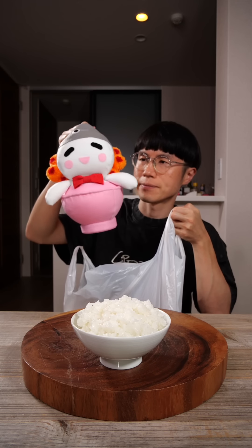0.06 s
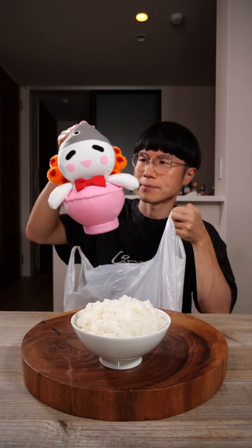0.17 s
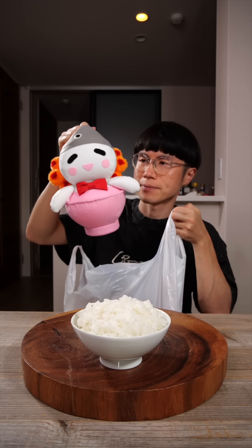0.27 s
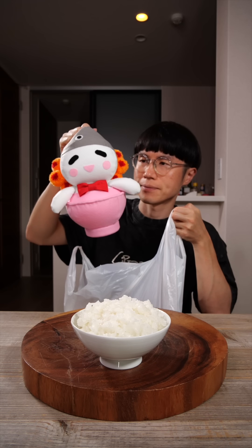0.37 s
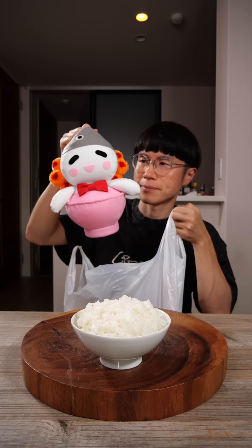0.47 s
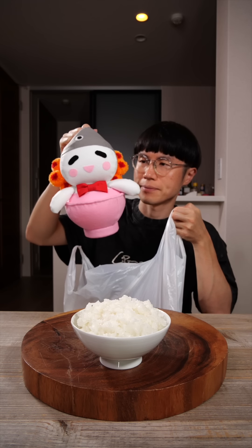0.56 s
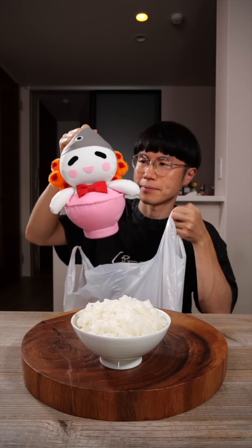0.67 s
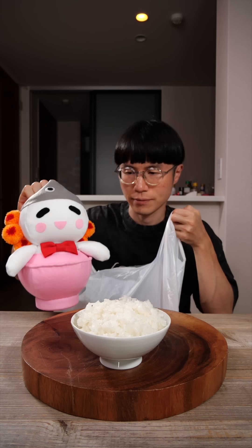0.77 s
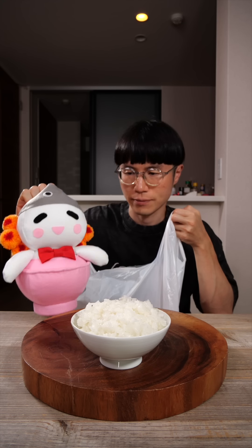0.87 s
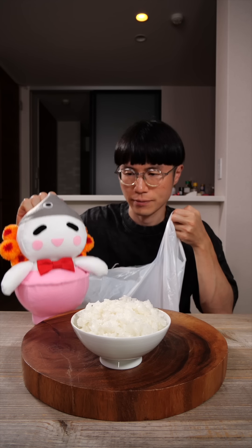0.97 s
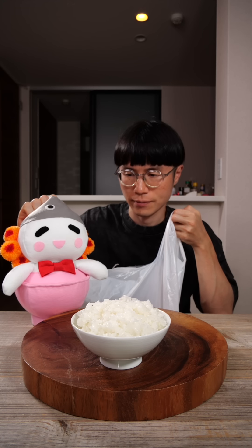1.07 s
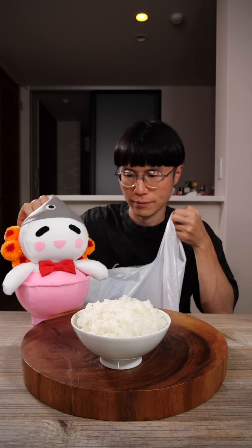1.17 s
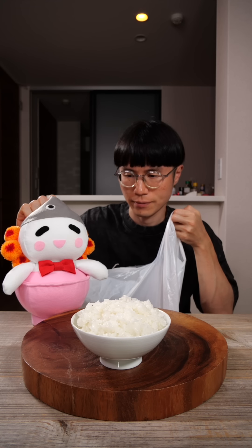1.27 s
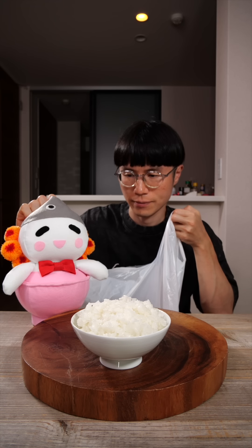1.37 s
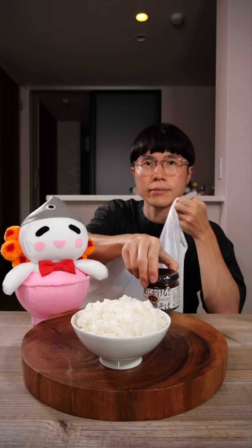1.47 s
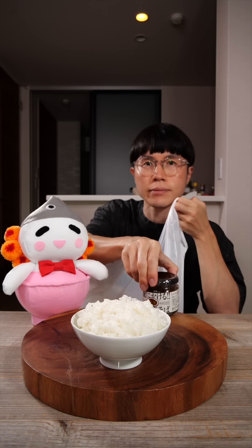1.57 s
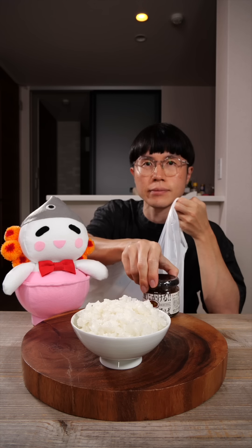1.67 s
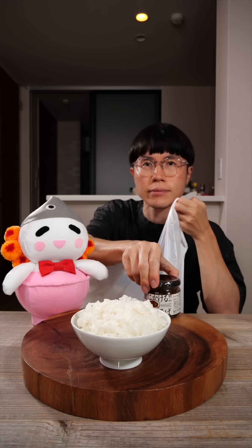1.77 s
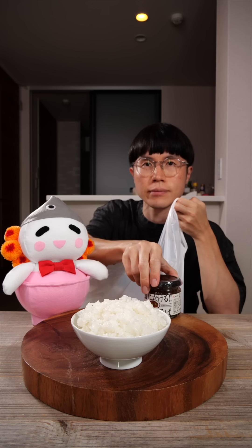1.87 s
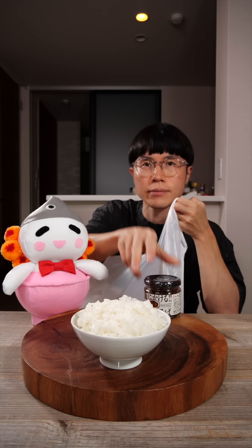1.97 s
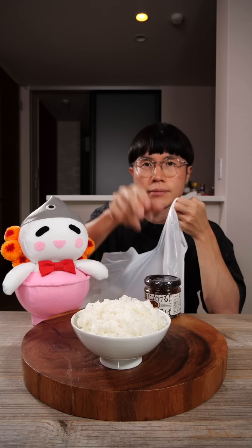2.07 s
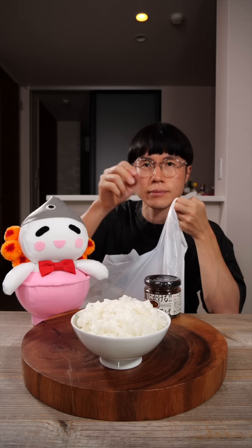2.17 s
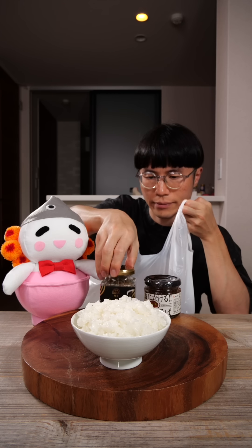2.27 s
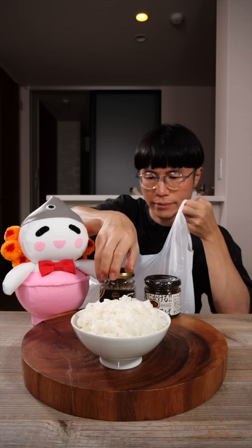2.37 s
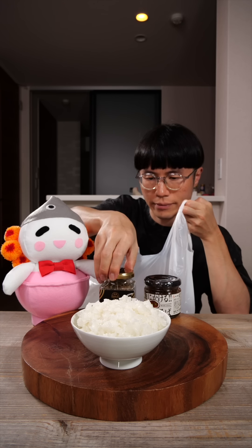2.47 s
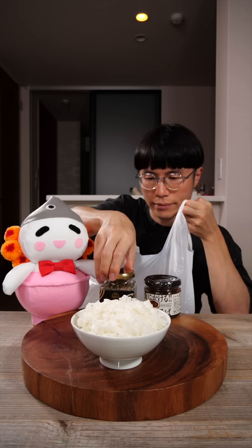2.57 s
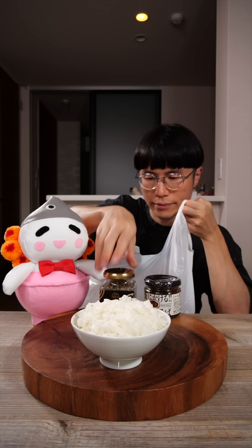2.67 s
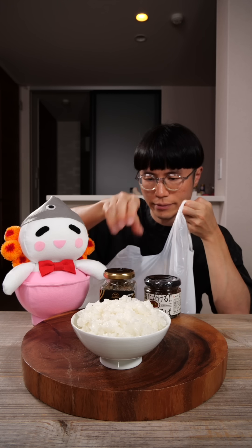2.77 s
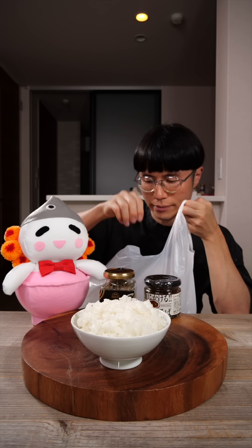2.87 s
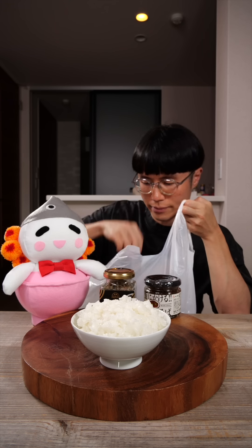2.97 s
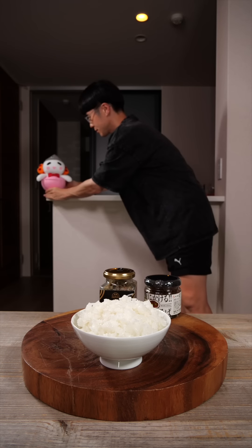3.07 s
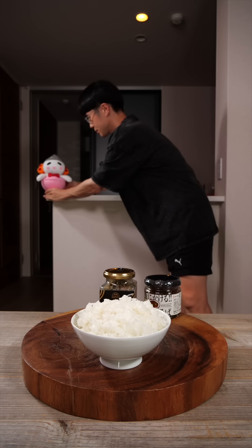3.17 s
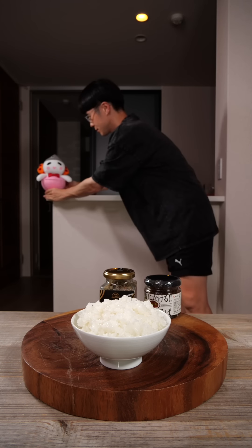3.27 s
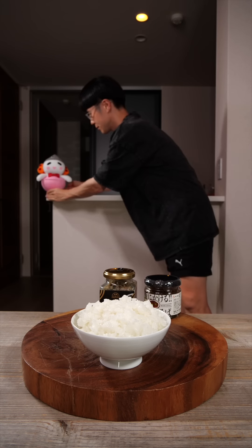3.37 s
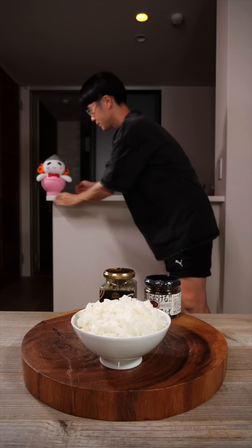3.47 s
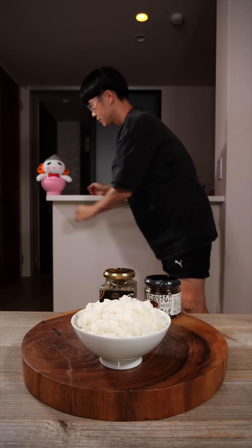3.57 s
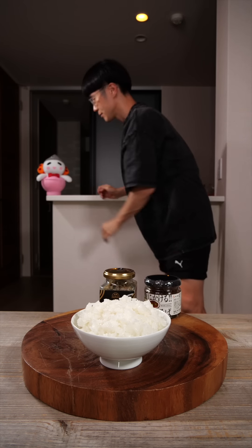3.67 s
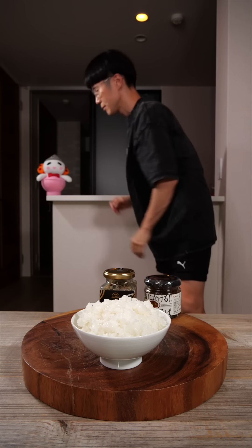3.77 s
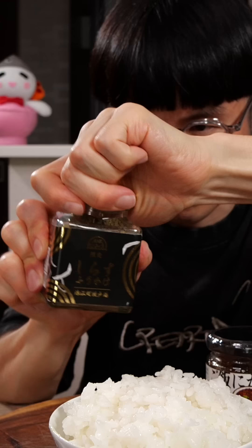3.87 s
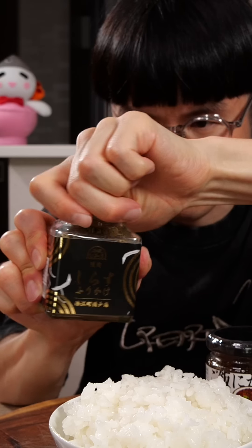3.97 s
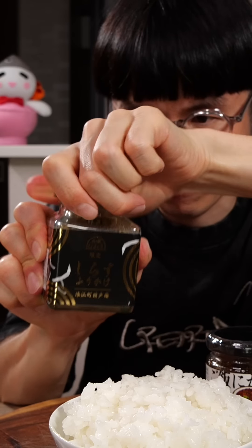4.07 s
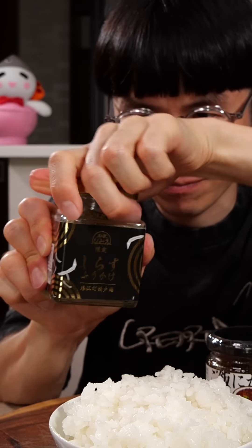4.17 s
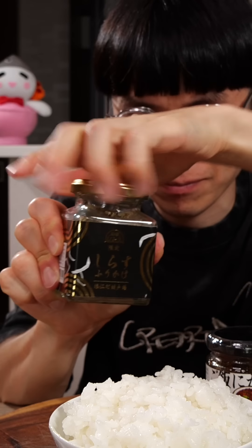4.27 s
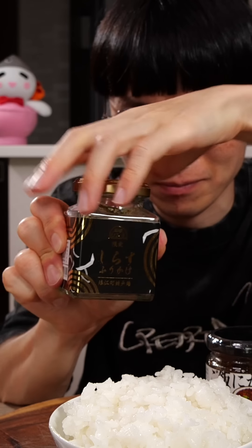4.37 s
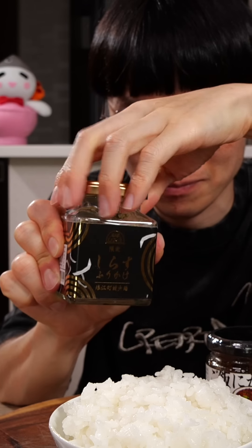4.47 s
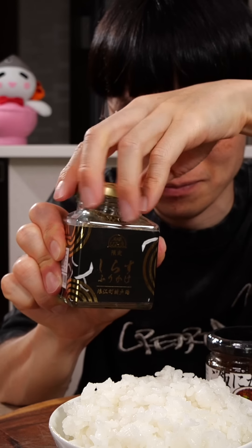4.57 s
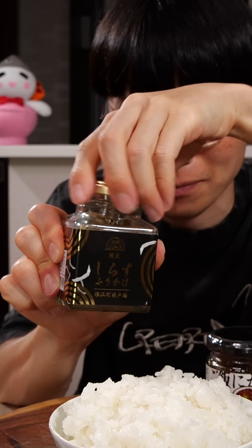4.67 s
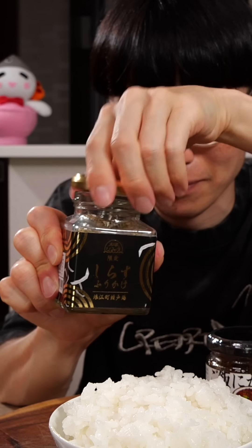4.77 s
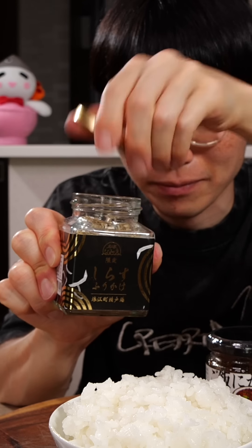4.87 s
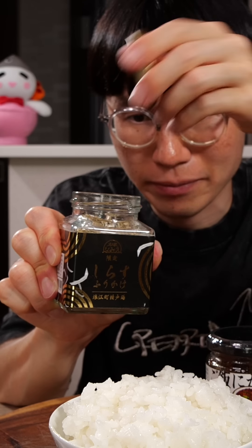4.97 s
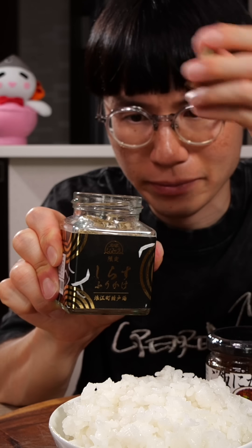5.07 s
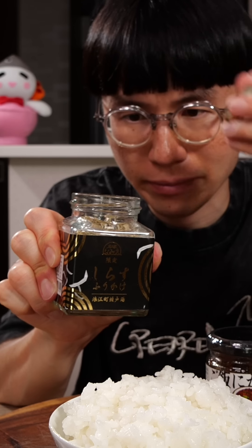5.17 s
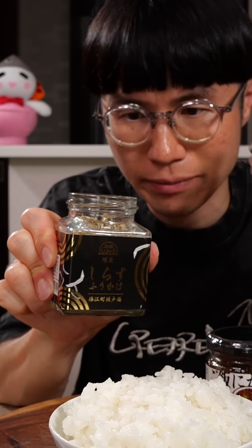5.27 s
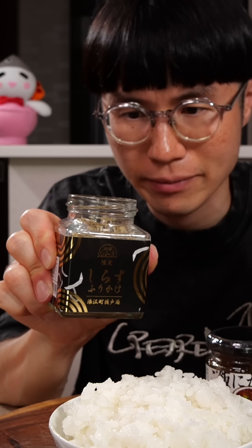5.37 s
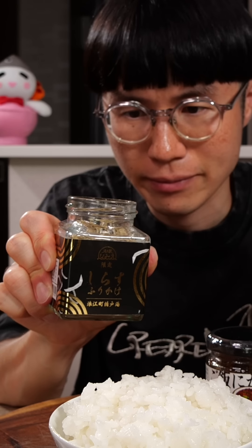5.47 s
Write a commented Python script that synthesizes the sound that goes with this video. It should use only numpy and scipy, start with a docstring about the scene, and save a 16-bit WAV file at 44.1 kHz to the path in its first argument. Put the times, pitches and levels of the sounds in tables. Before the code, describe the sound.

In a quiet living room, a thin plastic bag crackles lightly in short pulls. A plush toy lands softly on the wooden table, then two full glass jars knock down with short muffled clacks. The rustling stops, the toy thumps a counter, and cloth swishes faintly. Finally a metal lid scrapes and ticks against its glass jar, recorded in stereo with short room echo.

```python
"""Unpacking at a wooden table in a quiet living room: a thin plastic bag crinkles as its film creases and snaps.
A plush toy is put down and sets the table top ringing; two full glass jars knock on it with short clacks.
The toy thumps onto a counter further back, then clothes swish in a fine hiss as cloth slides on cloth.
Close by, a metal lid is twisted off a jar: it sticks and slips on the thread and ticks against the rim.
Soft noise is the room tone throughout, and every other source also echoes in the room."""
import sys
import numpy as np
from scipy import signal
from scipy.fft import rfft, irfft, next_fast_len
from scipy.io import wavfile
from scipy.ndimage import map_coordinates

SR = 44100
rng = np.random.default_rng(int(sys.argv[2]) if len(sys.argv) > 2 else 0)


def transcribe(signal):
    """Save signal, clipped to [-1, 1], as a 16-bit WAV file at the path in sys.argv[1]."""
    frames = np.atleast_2d(signal).T
    limited = np.clip(frames, -1, 1)
    pcm = np.round(limited * 32767).astype(np.int16)
    wavfile.write(sys.argv[1], SR, pcm)


N = 243431
TIME = np.arange(N) / SR

# Ringing of the table top. Each row: frequency in Hz, width of the resonance in Hz, strength in dB.
TABLE_MODES = [(31.66, 22, -18), (194, 22, -15.5), (250, 17, -13.5), (330, 11, 4.5), (387, 35, -13),
               (521, 29, -11), (627, 4.4, -9), (690, 8.8, -18), (839, 18, -16), (1080, 14, -21.5)]
# How the room answers. Each row: frequency in Hz, time to fade by 60 dB in seconds, reverberation level in dB,
# likeness of left and right (1 = the same, 0 = unrelated).
ROOM_BANDS = [(97, 1, -5, 0.59), (277.8, .47, 2.5, 1), (750, .48, -3.5, 0.77), (1310, 0.41, -6, 0.44),
              (2340, .4, -8, 0.13), (6000, 0.72, -8.5, .15), (14000, 0.82, -14, 0.12)]


def round_jar(room):
    """The full round jar lands on the wood and settles."""
    # Each row: start in seconds, level in dB, contact hardness as a treble limit in Hz.
    knocks = [(1.676, 1, 3546), (1.782, -21.5, 1400), (1.7855, -11.5, 1400)]
    # The jar standing on the wood. Each row: frequency in Hz, width in Hz, strength in dB.
    modes = [(446, 160, -10.5), (614, 120, -0.5), (1053, 180, 11), (1310, 100, -1), (1610, 140, -1),
             (1995, 82, 1.5), (2176, 110, -3), (2680, 64, -16), (4250, 320, -13)]
    knocking = jar(knocks, modes, table_db=-31, glass_top_hz=3280, table_low_hz=307)
    return place(knocking, room, pan_db=-3.0, lag_ms=0.018, wet_db=1.0)


def square_jar(room):
    """The full square jar lands on one edge, then flat, and rocks."""
    # Each row: start in seconds, level in dB, contact hardness as a treble limit in Hz.
    knocks = [(2.379, -44.5, 3000), (2.402, -1.5, 2660), (2.4064, -9, 2200), (2.420, -13, 800),
              (2.469, -32, 1350), (2.5305, -19, 1290)]
    # The jar standing on the wood. Each row: frequency in Hz, width in Hz, strength in dB.
    modes = [(485, 220, -30), (700, 490, 9.5), (932, 330, -8.5), (1156, 140, 18.5), (1272, 117.4, -28),
             (1800, 80, 0), (2500, 74, -6), (3417, 230, -23.5), (4460, 1200, -4)]
    knocking = jar(knocks, modes, table_db=-27, glass_top_hz=3520, table_low_hz=410)
    return place(knocking, room, pan_db=-3.0, lag_ms=0.07, wet_db=1.5)


def jar(knocks, modes, table_db, glass_top_hz, table_low_hz):
    """A full jar gives a short clack, muffled by its contents, and sets the table top ringing."""
    clack = blows(knocks, modes, low_hz=165, scatter_db=5.0, port_scatter=0.2)
    clack = cut(clack, glass_top_hz, order=5)
    table = from_db(table_db) * blows(knocks, TABLE_MODES, low_hz=table_low_hz)
    return disperse(clack + table, hz=1020, sharpness=2.1)


def lid(crack_db=-16.5, crack_s=0.005, grit_db=-14):
    """Metal sticks and slips on the glass thread in dense gritty bursts, and ticks on the rim with a tiny crack."""
    # The lid slips along the thread. Each row: start in seconds, length in seconds, level in dB,
    # contact hardness as a treble limit in Hz.
    thread_slips = [(3.898, 0.071, -54.5, 2600), (4.061, 0.02, -41, 1970), (4.214, 0.012, -28, 8150),
                    (4.223, 0.026, -20.5, 10700), (4.312, 0.022, -29, 4350), (4.344, 0.018, -34, 2700),
                    (4.361, 0.021, -29, 8150), (4.381, 0.028, -38, 6600), (4.507, 0.0145, -23.5, 9000),
                    (4.514, 0.014, -25.5, 1570), (4.673, 0.087, -40.5, 2080), (4.763, 0.043, -39, 1650)]
    # The lid ticks on the glass. Each row: start in seconds, level in dB, contact hardness as a treble limit in Hz.
    rim_ticks = [(4.037, -21, 4500), (4.0541, -17, 4270), (4.076, -21.5, 1270), (4.0979, -22.5, 6180),
                 (4.165, -30, 1500), (4.1978, -25.5, 1700), (4.239, -33, 12000), (4.3932, -16.5, 14000),
                 (4.501, -16.5, 12000), (4.5147, -7, 12100), (4.5156, -5.5, 6340), (4.5552, -22.5, 2600),
                 (4.6251, -10.5, 7850), (4.6771, -19, 1400), (4.703, -15.5, 2260), (4.7716, -19, 1900),
                 (4.812, -23, 12000), (4.8552, -25.5, 3450)]
    rubbing = grains(per_s=1800, spread_db=0.0)
    out = np.zeros((2, N))
    for s, length, db, hardness_hz in thread_slips:
        count = int(length * SR)
        slips = rubbing[int(s * SR):][:count] * signal.windows.tukey(count, .3)
        ringing = signal.fftconvolve(slips[None], lid_blow(s, hardness_hz), axes=1)
        # even out the loudness over the length of the slip
        ringing *= np.sqrt(2 * count / np.sum(ringing ** 2))
        add(out, s, from_db(db) * ringing)
        noise = rng.standard_normal((2, SR // 10))[:, :count]
        grit = cut(cut(noise * rms_one(slips), hardness_hz), 670, "high")
        add(out, s, from_db(db + grit_db) * grit)
    t = TIME[:SR // 100]
    for s, db, hardness_hz in rim_ticks:
        add(out, s, from_db(db) * lid_blow(s, hardness_hz))
        crack = cut(rng.standard_normal((2, len(t))) * np.exp(-t / crack_s), 2500, "high")
        add(out, s, from_db(db + crack_db) * peak_one(crack))
    return out


def lid_blow(s, hardness_hz):
    """One touch of the lid on the glass; its resonances come out a little differently each time."""
    return blow(lid_modes(s), hardness_hz, low_hz=220, scatter_db=2.2, port_scatter=.65)


def lid_modes(s):
    """The lid rings lower while tight and differently once off the thread; every touch detunes it a little."""
    # The lid gripping the thread. Each row: frequency in Hz (before the pitch factor), width in Hz, strength in dB.
    seated = [(385, 46, -5.5), (463.6, 37, -3), (740, 600, -13.5), (1140, 133, 0), (1247, 34, 4.5),
              (1880, 160, -7.5), (2124, 32, 4.5), (2600, 78, -12), (2970, 150, -7), (3383, 66, 1.5),
              (4200, 31, -16), (4290, 153, 0.5), (5020, 68, -11.5), (5715, 51, -0.5), (7500, 290, -10),
              (8100, 140, -29), (8880, 36, 1.5), (10200, 96, -32), (10700, 148, -17), (10840, 960, -8),
              (12870, 135.4, -2), (13520, 80, 4), (14270, 140, -20)]
    # The lid sitting loose on the neck. Each row: frequency in Hz, width in Hz, strength in dB.
    loose = [(407, 43, -27), (660, 150, -12), (870, 100, -13.5), (1064, 130, -3), (1186, 63, 8.5),
             (2116, 95, 0.5), (3040, 440, -9), (3308, 42, 4), (4420, 190, -8.5), (4900, 130, -3.5),
             (5660, 210, 3.5), (5780, 90, -1.5), (6450, 170, -9), (7300, 560, -9), (9100, 90, -7.5),
             (10800, 2500, -8.5), (11100, 490, -30), (13300, 790, -18), (15200, 400, -11.5)]
    gives_s, free_s, tight_pitch = 4.18, 4.45, .94
    modes = np.array(seated if s < free_s else loose)
    detune = 1 + .009 * rng.standard_normal(len(modes))
    pitch = tight_pitch if s < gives_s else 1
    return np.column_stack([modes[:, 0] * pitch * detune, modes[:, 1:]])


def bag(rustle_db=3.5, drag_db=-2.5):
    """Thin film buckles: a stream of tiny creases to either side, single sharp snaps, a duller rub under a jar."""
    # A hand pulls at the bag. Each row: start in seconds, length in seconds, relative level in dB.
    pulls = [(0, 0.016, -55), (.15, 0.013, -54.5), (.243, 0.006, -54), (.54, 0.018, -62),
             (.65, 0.017, -66.5), (.946, .03, -55), (1.035, .02, -64.5), (1.472, 0.038, -51),
             (1.54, 0.12, -57.5), (1.737, 0.063, -58.5), (1.95, 0.13, -53.5), (2.205, 0.013, -70.5),
             (2.885, 0.053, -64), (3.01, 0.05, -53.5)]
    # A jar drags through the bag. Each row: start in seconds, length in seconds, relative level in dB.
    drags = [(1.495, .015, -49.5), (1.55, 0.012, -49)]
    # The sharpest folds snap. Each row: start in seconds, level in dB.
    snaps = [(0.139, -40), (0.176, -39.5), (0.2209, -33), (0.2493, -31), (0.4909, -33.5), (0.5445, -30),
             (0.6414, -39), (0.6615, -41), (0.8976, -39.5), (0.9494, -30.5), (1.054, -32), (1.126, -40.5),
             (1.4157, -42.5), (1.4734, -30), (1.5506, -29), (1.7364, -32), (1.9523, -36.5), (2.0118, -36),
             (2.2082, -32.5), (2.6824, -43), (2.911, -41), (2.9886, -34.5), (3.021, -32)]
    # Tone of the film. Each row: frequency in Hz, relative level in dB per Hz.
    film = [(410, -28.5), (700, -8), (1080, -6.5), (1600, -6), (2160, -4.5), (5400, -3), (7200, -5),
            (12800, -11.5), (14400, -16.5), (16000, -18)]
    creases = spread(*[grains(per_s=610, spread_db=1.5) for _ in range(2)], likeness=0.13)
    rustle = np.array([colour(side, film) for side in creases])
    # the film tightens at once, then relaxes
    pulling = strokes(pulls, attack_s=0.0049, release_db_per_s=225.5)
    out = from_db(rustle_db) * pulling * rustle

    rub = cut(cut(grains(per_s=490, spread_db=6.0), 450, "high"), 1400)
    dragging = strokes(drags, attack_s=.025, release_db_per_s=189)
    out += from_db(drag_db) * dragging * rms_one(rub)

    t = TIME[:SR // 40]
    buckle = np.exp(-t / .0011)
    for s, db in snaps:
        snap = peak_one(colour(rng.standard_normal(len(t)) * buckle, film))
        # left minus right: the folds lie mostly on the right
        pan_db = -4.5 + 6 * rng.standard_normal()
        add(out, s, from_db(db) * snap * from_db([[pan_db / 2], [-pan_db / 2]]))
    return out


def toy_on_table(room):
    """The plush toy lands softly, so only the lower part of the table's ringing is heard."""
    # Each row: start in seconds, level in dB, contact hardness as a treble limit in Hz.
    landings = [(1.0575, -17, 636)]
    thump = blows(landings, TABLE_MODES, low_hz=22, order=5)
    return place(thump, room, pan_db=-1.0, lag_ms=0.15, wet_db=-6.0)


def toy_on_counter(room):
    """The toy thumps onto the counter in a few close contacts and sets it ringing."""
    # Each row: start in seconds, level in dB, contact hardness as a treble limit in Hz.
    landings = [(3.090, -41.5, 460), (3.096, -22.5, 470), (3.1245, -28.5, 476)]
    # Ringing of the counter. Each row: frequency in Hz, width in Hz, strength in dB.
    modes = [(145, 14, -46), (207, 12.4, 4.5), (250, 27, -3), (320.7, 8, -4), (383, 23, -27),
             (506, 22, -14.5), (638, 14, -21.5), (730, 16, -12)]
    thump = blows(landings, modes, low_hz=160, order=4)
    return place(thump, room, pan_db=-1.0, lag_ms=.15, wet_db=-4.0)


def clothes(swish_db=-3.0):
    """Cloth slides on cloth in a fine, even hiss."""
    # An arm or the body sweeps round. Each row: start in seconds, length in seconds, relative level in dB.
    swishes = [(3.47, .12, -65), (3.63, 0.044, -62), (3.895, 0.0072, -61.5)]
    # Tone of the cloth. Each row: frequency in Hz, relative level in dB per Hz.
    cloth = [(530, -19.5), (900, -7), (1230, -7.5), (1340, -9), (1680, -8.5), (1830, -4.5), (11400, -5),
             (16000, -12.5)]
    # a longer sweep also builds up more slowly
    attack_s = [0.93 * length for _, length, _ in swishes]
    hiss = colour(rng.standard_normal(N), cloth)
    return from_db(swish_db) * strokes(swishes, attack_s, release_db_per_s=91.5) * hiss


def air(level_db=-61, early_db=-3.5, rumble_starts_s=.32):
    """Steady room tone, alike on both sides in the bass; at first it is softer and lacks its low rumble."""
    # Tone of the room. Each row: frequency in Hz, relative level in dB per Hz.
    room_tone = [(20, -12.5), (50, -12.5), (75, -6.5), (100, -17.5), (130, -8.5), (250, 1), (330, -3),
                 (500, -5), (900, -11.5), (1600, -19), (4000, -24.5), (10000, -31), (15000, -35),
                 (16000, -39.5)]
    noises = [colour(white, room_tone) for white in rng.standard_normal((2, N))]
    noises = rfft(noises, 2 * next_fast_len(N // 2 + 1))
    likeness = at_hz(ROOM_BANDS, np.linspace(0, SR / 2, noises.shape[1]), axis=3)
    tone = from_db(level_db) * irfft(spread(*noises, 0.85 * likeness))[:, :N]
    early = from_db(early_db) * cut(tone, 450, "high", order=1)
    return np.where(TIME < rumble_starts_s, early, tone)


def room_response(first_wall_s=0.0022, build_s=0.0028):
    """Diffuse reflections build up after the first wall and die away band by band."""
    t, hz = TIME[:SR], np.arange(SR // 2 + 1)
    pair = spread(*rfft(rng.standard_normal((2, SR))), at_hz(ROOM_BANDS, hz, axis=3))
    onset = np.clip((t - first_wall_s) / build_s, 0, 1)
    edges, out = np.geomspace(70, 18000, 13), 0
    for low, high in zip(edges, edges[1:]):
        centre = np.sqrt(low * high)
        # a fade of 60 dB is a factor of 1000
        decay = onset * np.exp(-np.log(1000) * t / at_hz(ROOM_BANDS, centre))
        band = irfft(pair * ((hz >= low) & (hz < high)))
        gain = from_db(at_hz(ROOM_BANDS, centre, axis=2))
        out = out + gain * decay / np.linalg.norm(decay) * band
    return out


def place(x, room, pan_db, lag_ms, wet_db):
    """The direct sound reaches the left microphone first; the room's echo is added to it."""
    x = np.broadcast_to(x, (2, N))
    late = map_coordinates(x[1], [np.arange(N) - lag_ms * SR / 1000], order=3)
    direct = np.array([x[0], late]) * from_db([[pan_db / 2], [-pan_db / 2]])
    echo = signal.fftconvolve(x.mean(0)[None], room, axes=1)[:, :N]
    return direct + from_db(wet_db) * echo


def blows(events, modes, low_hz, scatter_db=0, port_scatter=0, order=2):
    """A series of blows on one body."""
    out = np.zeros((2, N))
    for s, db, hardness_hz in events:
        add(out, s, from_db(db) * blow(modes, hardness_hz, low_hz, scatter_db, port_scatter, order))
    return out


def blow(modes, hardness_hz, low_hz, scatter_db, port_scatter=0, order=2):
    """One blow rings the resonances, peak 1; a soft contact leaves out the high ones."""
    ringing = cut(body(modes, scatter_db, port_scatter), hardness_hz, order=order)
    return peak_one(cut(ringing, low_hz, "high", order=3))


def body(modes, scatter_db=0, port_scatter=0):
    """Fading resonances in stereo; each contact point drives them a little differently if scatter is given."""
    hz, width, db = np.transpose(modes)[:, :, None]
    t = TIME[:int(min(SR * 2 // 3, 2 * SR / width.min()))]
    strength = width * from_db(db + scatter_db * rng.standard_normal(db.shape))
    # short waves reach the two microphones with unlike phases (port_scatter: radians at 4 kHz)
    skew = port_scatter * np.sqrt(hz / 4000) * rng.standard_normal(db.shape)
    decay = strength * np.exp(-np.pi * width * t)
    sides = [np.sum(decay * np.cos(2 * np.pi * hz * t + sign * skew), axis=0) for sign in (1, -1)]
    return np.array(sides)


def disperse(x, hz, sharpness, count=3):
    """Bending waves in wood travel at unlike speeds, which draws a blow out over a few milliseconds."""
    _, poles = signal.iirpeak(hz, max(sharpness, .5), fs=SR)
    for _ in range(count):
        # all-pass filter: shifts timing but keeps every frequency's level
        x = signal.lfilter(poles[::-1], poles, x)
    return x


def strokes(rows, attack_s, release_db_per_s):
    """Gain of a series of movements: each builds up to its start time, holds for its length and dies away."""
    s, length, db = np.transpose(rows)[:, :, None]
    attack = np.clip(1 + (TIME - s) / np.reshape(attack_s, (-1, 1)), 0, 1)
    release_db = release_db_per_s * np.maximum(TIME - s - length, 0)
    return np.linalg.norm(attack * from_db(db - release_db), axis=0)


def grains(per_s, spread_db):
    """Random clicks of uneven size (equal when spread_db is 0); rms 1."""
    sizes = from_db(spread_db * np.minimum(rng.exponential(1, N), 4))
    sizes = sizes * rng.choice([-1, 1], N)
    return rms_one(sizes * (rng.random(N) < per_s / SR))


def spread(mid, side, likeness):
    """Two unrelated signals make a stereo pair of the given likeness."""
    likeness = np.clip(likeness, 0, 1)
    shared, opposed = np.sqrt(1 + likeness) * mid, np.sqrt(1 - likeness) * side
    return np.array([shared + opposed, shared - opposed]) / np.sqrt(2)


def colour(x, spectrum):
    """Filter that follows a spectrum without sounding ahead of time (minimum phase), with unit power gain."""
    size = 8192
    gain = from_db(at_hz(spectrum, np.linspace(0, SR / 2, size // 2 + 1)))
    cepstrum = irfft(np.log(gain))
    # folding the cepstrum forward in time gives the minimum-phase response
    fold = np.r_[1, np.full(size // 2 - 1, 2), np.zeros(size // 2)]
    response = irfft(np.exp(rfft(cepstrum * fold)))
    return signal.fftconvolve(x, response / np.linalg.norm(response))[:len(x)]


def cut(x, hz, kind="low", order=2):
    """Low-pass or high-pass."""
    return signal.sosfilt(signal.butter(order, min(hz, SR / 2 - 1000), kind, fs=SR, output="sos"), x)


def at_hz(points, hz, axis=1):
    """Reads one column of a table along log frequency."""
    points = np.array(points)
    return np.interp(np.log(np.maximum(hz, 1)), np.log(points[:, 0]), points[:, axis])


def add(track, s, sound):
    """Mixes a sound into the track at time s."""
    start = round(s * SR)
    track[..., start:start + sound.shape[-1]] += sound[..., :N - start]


def from_db(db):
    """Decibels to gain."""
    return 10 ** (np.asarray(db) / 20)


def rms_one(x):
    """Scales to rms 1."""
    return x / np.sqrt(np.mean(x ** 2) + 1e-20)


def peak_one(x):
    """Scales to peak 1."""
    return x / np.max(np.abs(x))


def scene():
    """Every source but the room tone is placed before one pair of microphones, in the same room."""
    room = room_response()
    toy = toy_on_table(room) + toy_on_counter(room)
    jars = round_jar(room) + square_jar(room)
    opening = place(lid(), room, pan_db=-1.0, lag_ms=0.062, wet_db=-1.5)
    crinkle = place(bag(), room, pan_db=-2.3, lag_ms=.12, wet_db=3.5)
    crinkle = crinkle * (TIME < 3.072)  # the bag and its echo stop at once
    swish = place(clothes(), room, pan_db=-6.0, lag_ms=0.029, wet_db=13.5)
    return toy + jars + opening + crinkle + swish + air()


def record(dry):
    """The treble is cut steeply above 15800 Hz."""
    return signal.sosfilt(signal.ellip(10, .2, 80, 15800, fs=SR, output="sos"), dry)


dry = scene()
out = record(dry)
transcribe(out)
```